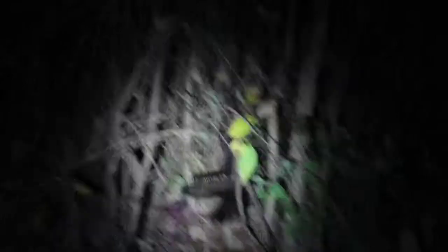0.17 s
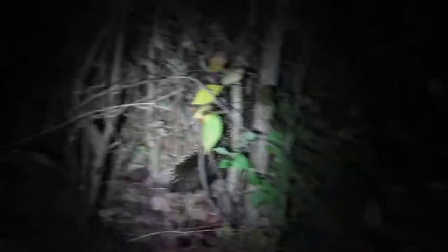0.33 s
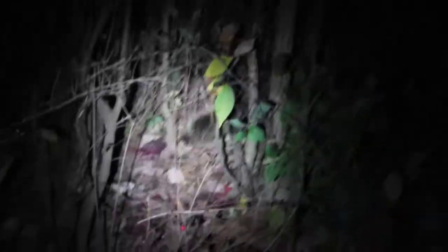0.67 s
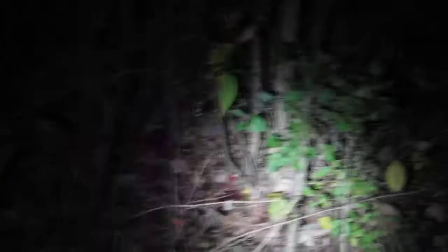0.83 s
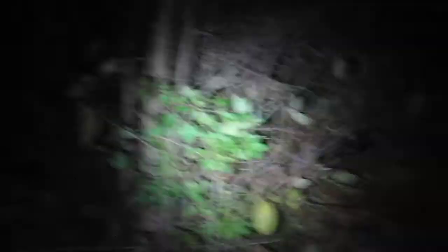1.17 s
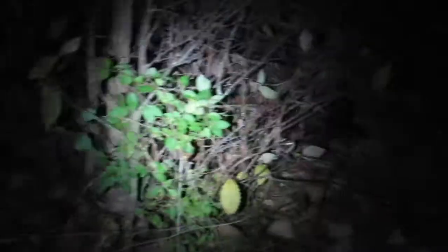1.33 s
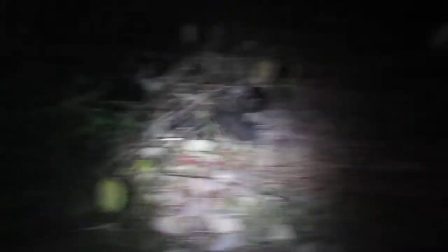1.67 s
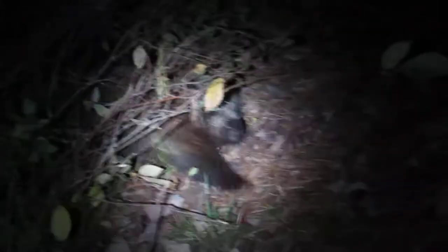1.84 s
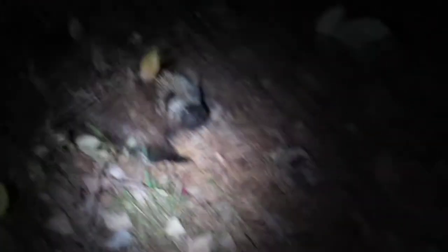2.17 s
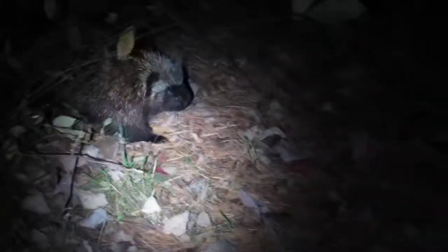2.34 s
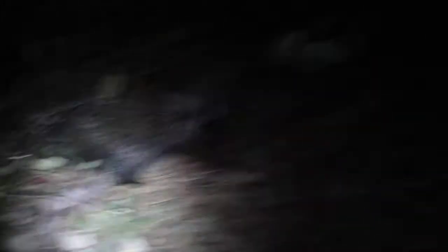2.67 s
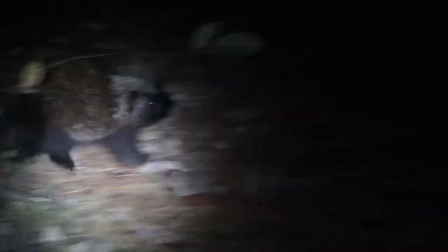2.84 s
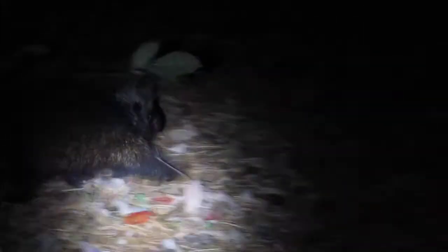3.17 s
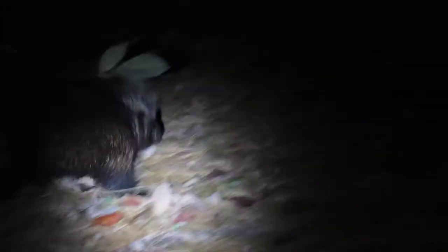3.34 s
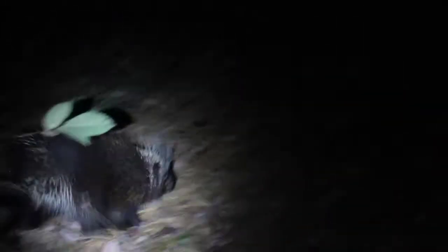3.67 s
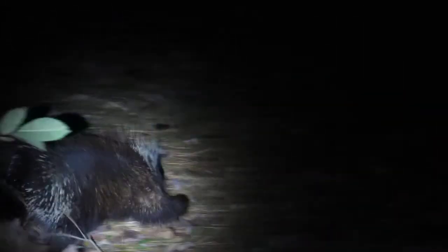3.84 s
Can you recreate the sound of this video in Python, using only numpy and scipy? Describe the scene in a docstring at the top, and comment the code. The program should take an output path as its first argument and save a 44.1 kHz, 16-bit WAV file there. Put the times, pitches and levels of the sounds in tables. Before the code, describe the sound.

Uneven rustling and crunching in dry leaf litter, with small twigs cracking underfoot.

```python
"""Dry leaves crackle in swells as an animal pushes through brush and litter in a forest at night.
The crackle is a sum of tiny brittle fractures. Sticks knock, twigs snap and steps crunch as
impulses excite damped resonances, and stems and ground scatter each sound into a short tail.
A person follows with a hand-held recorder, whose handling rumbles softly under the night air;
each microphone port resonates at a treble pitch of its own."""
import sys
import numpy as np
from scipy import signal
from scipy.fft import rfft, irfft
from scipy.io import wavfile

SR = 44100
rng = np.random.default_rng(int(sys.argv[2]) if len(sys.argv) > 2 else 0)


def transcribe(u):
    """Save the signal u as a 16-bit wav file named by the first command-line argument.

    u: samples, shape (n,) or (channels, n), limited to [-1, 1]; the rate is SR.
    q: integer samples, one column per channel.
    """
    v = np.clip(np.atleast_2d(u).T, -1, 1)
    q = np.round(v * 32767).astype(np.int16)
    wavfile.write(sys.argv[1], SR, q)


N = 176400
T = np.arange(N) / SR
BIN_HZ = np.arange(N // 2 + 1) * SR / N
SIDES = np.array([[1], [-1]])  # left, right


def from_db(db):
    """Amplitude grows tenfold every 20 dB."""
    return 10 ** (np.asarray(db) / 20)


def unit_rms(x):
    """Dividing by the rms gives unit mean power."""
    return x / np.sqrt(np.mean(x ** 2) + 1e-20)


def envelope(rows):
    """Gain moves linearly in decibels between points in time."""
    return from_db(np.interp(T, *np.transpose(rows)))


def at_hz(points, hz):
    """A spectrum is interpolated on a logarithmic frequency axis."""
    freqs, values = np.transpose(points)
    return np.interp(np.log(np.maximum(hz, 1)), np.log(freqs), values)


def panned(db):
    """A level difference between left and right gives direction."""
    return from_db(SIDES * db / 2)


def filtered(x, order, hz, kind="low"):
    """A maximally flat filter passes one range of frequencies."""
    return signal.sosfilt(signal.butter(order, hz, kind, fs=SR, output="sos"), x + 1e-18)


def resonate(x, hz, q, lowpass=False):
    """A damped oscillator responds as a band-pass or a resonant low-pass."""
    angle = 2 * np.pi * hz / SR
    radius = np.exp(-angle / (2 * q))
    feedback = [1, -2 * radius * np.cos(angle), radius ** 2]
    forward = [sum(feedback)] if lowpass else np.array([1, 0, -1]) * (1 - radius ** 2) / 2
    return signal.lfilter(forward, feedback, x + 1e-18)


# Likeness of the two channels. Each row: frequency in Hz, correlation from 0 to 1.
COHERENCE = [(30, .15), (65, .5), (130, .78), (1000, .8), (3000, .4), (8000, .2)]
def stereo_noise(spectrum):
    """Partial coherence: the channels share one noise and take another with opposite signs."""
    mid, side = rfft(rng.standard_normal((2, N)))
    alike = at_hz(COHERENCE, BIN_HZ)
    both = np.sqrt(1 + alike) * mid + np.sqrt(1 - alike) * side * SIDES
    low_cut = BIN_HZ / np.hypot(BIN_HZ, 18)
    return unit_rms(irfft(both * from_db(at_hz(spectrum, BIN_HZ)) * low_cut, N))


# Spectrum of the night air. Each row: frequency in Hz, relative spectral density in dB.
AIR_SPECTRUM = [(60, 10), (150, 1.5), (300, -2), (500, -3.5), (800, -8.5), (1050, -5), (1400, -9),
                (3000, -10), (6000, -15), (9000, -17), (15500, -39.5)]
def night_air():
    """The air is stationary noise, strongest in the bass."""
    return from_db(-54.5) * stereo_noise(AIR_SPECTRUM)


def fractures(per_s, spread_db, pan_db=3.5, lag_s=.000024):
    """Independent breaks, mostly small, take direction from differences in level and arrival time."""
    chance, pan, lag = rng.random(N), rng.standard_normal(N), rng.standard_normal(N)
    size = from_db(spread_db * np.minimum(rng.exponential(1, N), 5)) * rng.choice([-1, 1], N)
    onsets = np.flatnonzero(chance < per_s / SR)
    arrivals = onsets + SIDES * lag[onsets] * lag_s * SR / 2
    return size[onsets] * panned(pan[onsets] * pan_db), arrivals, onsets


def clicks(sizes, arrivals):
    """Impulses superpose into one train for each channel."""
    samples = np.clip(np.round(arrivals), 0, N - 1).astype(int)
    return np.array([np.bincount(at, size, N) for at, size in zip(samples, sizes)])


# Spectrum of breaking leaves. Each row: frequency in Hz, relative spectral density in dB.
LEAF_SPECTRUM = [(150, -2), (400, -1), (900, 0), (1600, -0.5), (2600, 1), (3600, 0), (4600, 0.5), (6000, 1),
                 (8000, -3), (9500, -8), (11500, -9.5), (15500, -20.5)]
def crackle(per_s, spread_db, colour_db=4):
    """An impulse is broadband: each leaf fracture excites all bands, with a colour of its own."""
    sizes, arrivals, onsets = fractures(per_s, spread_db)
    edges_hz, out = np.geomspace(150, 16500, 23), 0
    for low, high in zip(edges_hz, edges_hz[1:]):
        colour = from_db(colour_db * np.clip(rng.standard_normal(N), -2, 2)) * rng.choice([-1, 1], N)
        band = filtered(clicks(sizes * colour[onsets], arrivals), 2, [low, high], "band")
        density = from_db(at_hz(LEAF_SPECTRUM, np.sqrt(low * high)))
        out = out + unit_rms(band) * np.sqrt(high - low) * density
    return unit_rms(out)


def flutter(depth_db=.84, cutoff_hz=22):
    """Leaves catch and let go, modulating the amplitude at random."""
    return from_db(depth_db * unit_rms(filtered(rng.standard_normal(N), 2, cutoff_hz)))


# Continuous motion of the leaves. Each row: time in seconds, level in dB.
STIR_LEVELS = [(.07, -57.5), (.33, -56.5), (.39, -63), (.54, -63.5), (.59, -53.5), (.84, -50.5), (.9, -56),
               (1.1, -51), (1.27, -52.5), (1.45, -51.5), (1.58, -51), (1.82, -48), (2.02, -54.5),
               (2.32, -55.5), (2.66, -49.5), (2.95, -53), (3.15, -48.5), (3.22, -52), (3.52, -48.5),
               (3.59, -51), (3.74, -56), (3.86, -51.5), (4.0, -51)]
def stirring():
    """Dense fractures merge into a rustle while feet move through the litter."""
    return envelope(STIR_LEVELS) * flutter() * crackle(per_s=2200, spread_db=1.5)


def breaking_wood(rows, q, decay_s):
    """A click and a decaying burst of splinters excite the resonance of each piece."""
    out, t = np.zeros(N + SR), T[:SR // 10]
    for start_s, db, hz in rows:
        splinters = rng.standard_normal(len(t)) * np.exp(-t / decay_s(hz))
        splinters[0] = 5.8  # the opening click
        ring = resonate(splinters, hz, q)
        ring = resonate(ring, hz, q=.45, lowpass=True)
        start = int(start_s * SR)
        out[start:start + len(t)] += from_db(db) * ring / np.abs(ring).max()
    return out[:N]


# Sticks and clods struck underfoot. Each row: start in seconds, level in dB, resonance in Hz.
STICK_KNOCKS = [(.074, -47, 306), (.146, -35, 1600), (.155, -52, 1300), (.718, -44.5, 328),
                (1.709, -44, 266), (1.717, -28, 1680), (2.58, -23, 1110), (2.649, -38, 1440),
                (2.856, -37.5, 785), (2.96, -41, 1550), (2.9975, -29.5, 1170), (3.01, -36, 1200),
                (3.185, -30.5, 1460), (3.687, -37.5, 1250)]
def knocks(decay_cycles=1.8):
    """Heavy damping ends the knock of a thick stick within a few cycles."""
    return breaking_wood(STICK_KNOCKS, q=1.7, decay_s=lambda hz: decay_cycles / hz)


# Twigs and leaf stalks breaking. Each row: start in seconds, level in dB, resonance in Hz.
TWIG_SNAPS = [(.155, -35.5, 4200), (.2963, -35.5, 4460), (.409, -42, 4500), (.575, -32.5, 6000),
              (.608, -33.5, 4200), (.737, -36.5, 3500), (.7962, -26, 7850), (.8195, -36, 6100),
              (.929, -37, 8000), (1.538, -32, 4500), (1.682, -21, 4730), (1.7022, -20.5, 5260),
              (1.798, -30, 6500), (1.911, -28.5, 5800), (2.2432, -29.5, 4870), (2.289, -38, 3500),
              (2.3305, -33.5, 4400), (2.445, -33.5, 4500), (2.526, -31, 3520), (2.573, -28, 3500),
              (2.6415, -25.5, 4500), (2.7668, -28, 7100), (2.856, -33, 2980), (3.086, -28.5, 4000),
              (3.383, -33, 5500), (3.638, -31, 4000), (3.6755, -25, 4060), (3.829, -27, 4720),
              (3.9, -34, 4200)]
def snaps():
    """Brittle fracture of a thin twig is brief, so its spectrum is broad and bright."""
    cracks = breaking_wood(TWIG_SNAPS, q=1, decay_s=lambda hz: .0014)
    return panned(-1) * filtered(cracks, 4, hz=9200)


def swell(t, rise, fall):
    """Amplitude rises on a bell curve to t = 0, then decays as a compressed exponential."""
    return np.exp(-.75 * np.where(t < 0, (t / rise) ** 2, np.abs(t / fall) ** 1.38))


# Weight pressed on the litter. Each row: peak time in seconds, level in dB,
# rise and fall in seconds, resonance in Hz.
STEP_CRUNCHES = [(.17, -53, 0.011, 0.025, 1600), (0.263, -47.5, 0.014, 0.01, 2950),
                 (1.06, -57, 0.17, .08, 1380), (1.705, -45, 0.081, 0.028, 1460),
                 (2.53, -43.5, .01, 0.031, 2040), (2.578, -44.5, 0.021, 0.02, 1130),
                 (2.64, -44, 0.022, .028, 1230), (2.856, -42.5, .01, 0.0048, 880),
                 (2.888, -40.5, 0.01, 0.0047, 1880), (2.965, -52.5, 0.056, .02, 1440),
                 (3.008, -52.5, 0.013, 0.032, 1190), (3.41, -58, 0.031, 0.044, 1390),
                 (3.62, -52.5, 0.0066, .018, 2020), (3.7, -58, 0.028, 0.23, 1190),
                 (3.92, -47.5, 0.043, .04, 3360)]
def crunches():
    """Steps crush packed litter, and its coarser fractures drive a broad resonance."""
    sizes, arrivals, _ = fractures(per_s=1700, spread_db=2.5)
    train = filtered(clicks(sizes, arrivals), 2, hz=4500)
    return panned(.5) * sum(from_db(db) * swell(T - peak_s, rise, fall) * unit_rms(resonate(train, hz, q=1.7))
                            for peak_s, db, rise, fall, hz in STEP_CRUNCHES)


# Leaves swept aside. Each row: peak time in seconds, level in dB, rise and fall in seconds,
# extra body in dB, extra top in dB.
LEAF_SWEEPS = [(.258, -56, .03, 0.019, 2, 3), (.68, -57, .04, 0.029, -3, 5),
               (1.035, -52, 0.016, .03, 3, -1), (1.13, -48.5, .03, 0.051, -3.5, -4.5),
               (1.34, -49, 0.023, 0.011, -1, 0), (1.43, -48.5, 0.041, 0.09, -20, -4),
               (1.665, -40, 0.03, 0.036, -3, 3), (1.708, -38.5, 0.032, 0.037, -4.5, 1),
               (1.915, -42.5, 0.034, 0.031, -9, -0.5), (2.385, -46.5, 0.013, 0.044, -8, -5),
               (2.44, -49.5, 0.041, .035, 4.5, 2), (2.6, -44, 0.056, 0.028, 0, -2),
               (2.693, -47, 0.036, 0.013, -13, 1.5), (2.768, -41.5, .011, 0.018, -3, 3.5),
               (2.885, -47.5, 0.06, 0.024, -1.5, 0.5), (3.012, -43.5, 0.0077, 0.008, 1.5, 1),
               (3.095, -50.5, 0.036, 0.048, 1, 5.5), (3.285, -47.5, 0.029, 0.024, -6, -20),
               (3.404, -39, 0.028, 0.05, -10.5, 2.5), (3.622, -47, 0.0089, 0.013, 1.5, 2.5),
               (3.791, -42, 0.0051, 0.0041, -2.5, -2.5), (3.948, -42.5, 0.02, 0.018, -3.5, 3.5)]
def sweeps(body_hz=2380, top_hz=6360):
    """A body brushes the leaves; overlapping sweeps are incoherent and add in power in three bands."""
    spectrum = rfft(crackle(per_s=3500, spread_db=1))
    body = 1 / (1 + (BIN_HZ / body_hz) ** 4)
    top = 1 - 1 / (1 + (BIN_HZ / top_hz) ** 8)
    bands = [irfft(spectrum * share, N) for share in (body, 1 - body - top, top)]
    power = sum((from_db([[db + body_db], [db], [db + top_db]]) * swell(T - peak_s, rise, fall)) ** 2
                for peak_s, db, rise, fall, body_db, top_db in LEAF_SWEEPS)
    return flutter() * sum(band * gain for band, gain in zip(bands, np.sqrt(power)))


# Strength of the handling. Each row: time in seconds, level in dB.
HANDLING_LEVELS = [(.07, -93), (.6, -72), (1.1, -58), (1.8, -59.5), (2.15, -62), (2.48, -57.5), (2.62, -52),
                   (2.9, -45.5), (3.1, -52), (3.27, -59), (3.45, -50.5), (3.75, -52), (4.0, -52.5)]
# Spectrum of its rumble. Each row: frequency in Hz, relative spectral density in dB.
RUMBLE_SPECTRUM = [(20, -4.5), (33, 7), (48, -8), (66, 5.5), (90, -16), (115, -9), (160, -27), (300, -18),
                   (1000, -70)]
def handling():
    """Structure-borne vibration from the hand reaches the microphones as a low rumble."""
    return from_db(.5) * panned(.5) * envelope(HANDLING_LEVELS) * stereo_noise(RUMBLE_SPECTRUM)


def thicket(x, wet_db, t60_s=.09, low_cut_hz=1600):
    """Scattering from stems and ground gives each band a diffuse tail, different on each side."""
    edges_hz, out = np.geomspace(600, 10000, 6), x
    retained = from_db(-120 / (t60_s * SR))  # share of power left after one sample
    for low, high in zip(edges_hz, edges_hz[1:]):
        incident = filtered(x[0], 3, [low, high], "band")
        power = signal.lfilter([1 - retained], [1, -retained], incident ** 2)
        diffuse = unit_rms(filtered(rng.standard_normal((2, N)), 3, [low, high], "band"))
        out = out + from_db(wet_db) * low / np.hypot(low, low_cut_hz) * np.sqrt(power) * diffuse
    return out


def scene():
    """Leaves, steps and wood superpose with their scattered sound, over air and handling rumble."""
    background = night_air() + handling()
    leaves = thicket(stirring(), wet_db=-8) + thicket(sweeps(), wet_db=-8)
    steps = thicket(crunches(), wet_db=-18)
    wood = thicket(snaps() + knocks(), wet_db=-4.5)
    return background + leaves + steps + wood


# Microphone ports, left then right. Each row: resonance in Hz, quality factor, gain in dB.
MIC_PORTS = [(5060, 4.16, -3.4), (7830, 2.98, -1.05)]
def record(dry, start_s=.072, cutoff_hz=15800):
    """Each port is a resonant low-pass; hiss is added, the recorder starts and the top is cut."""
    ported = np.array([from_db(db) * resonate(x, hz, q, lowpass=True)
                       for x, (hz, q, db) in zip(dry, MIC_PORTS)])
    hiss = from_db(-66.5) * rng.standard_normal((2, N))
    top_cut = signal.ellip(12, .1, 80, cutoff_hz, fs=SR, output="sos")
    return signal.sosfilt(top_cut, (ported + hiss) * (T >= start_s))


dry = scene()
out = record(dry)
transcribe(out)
```